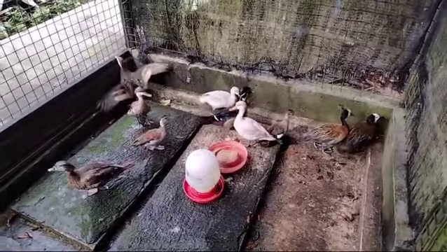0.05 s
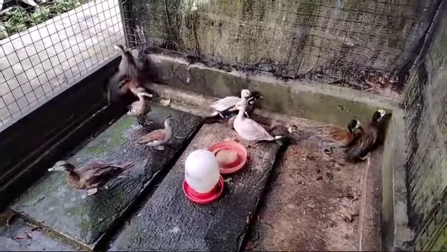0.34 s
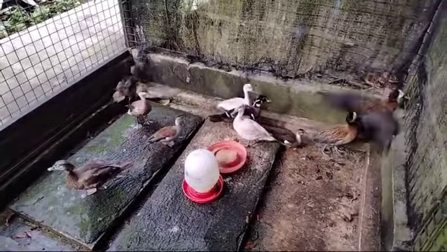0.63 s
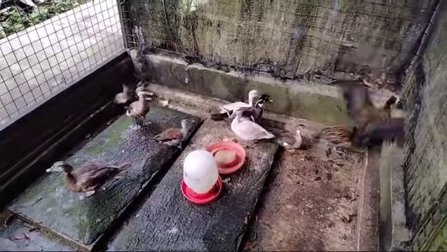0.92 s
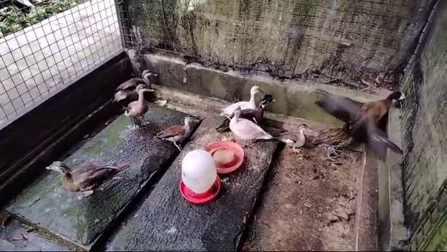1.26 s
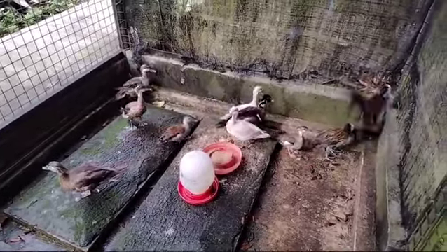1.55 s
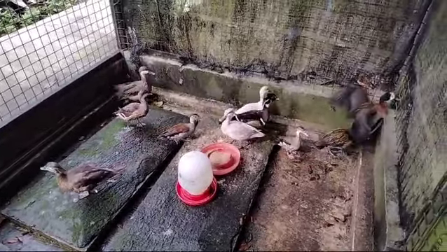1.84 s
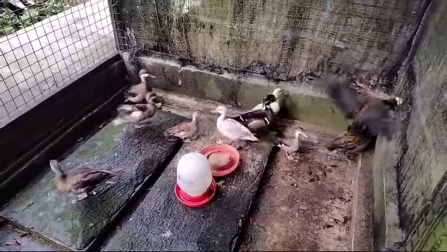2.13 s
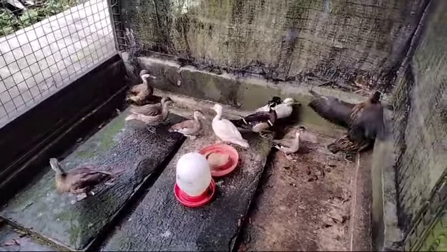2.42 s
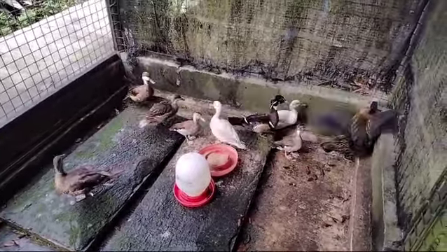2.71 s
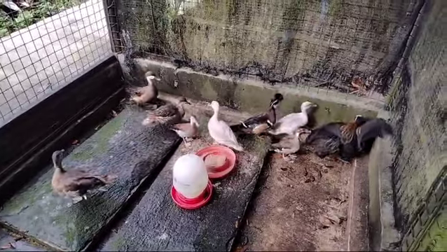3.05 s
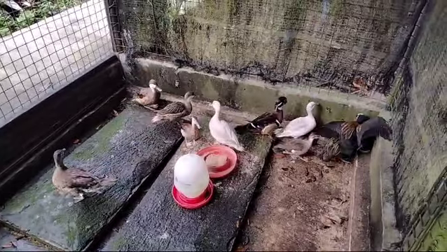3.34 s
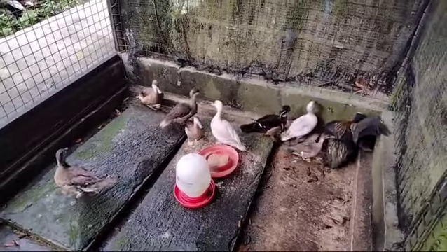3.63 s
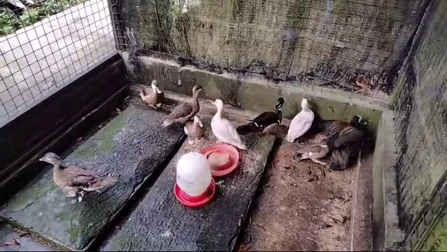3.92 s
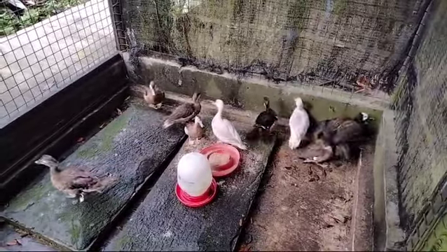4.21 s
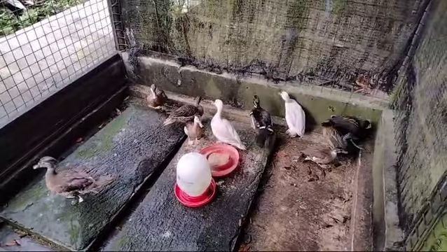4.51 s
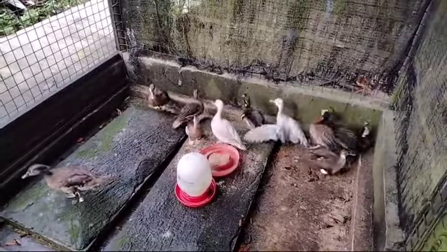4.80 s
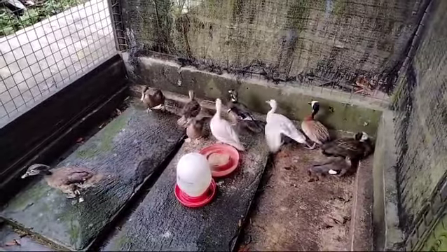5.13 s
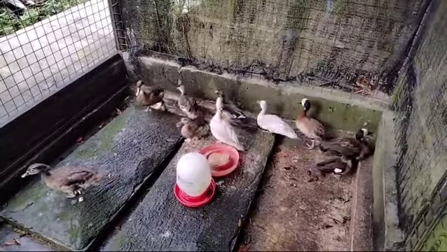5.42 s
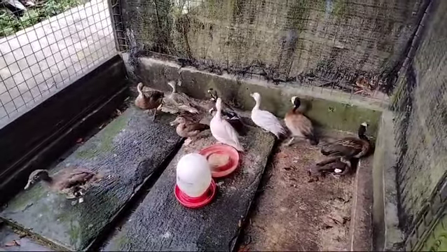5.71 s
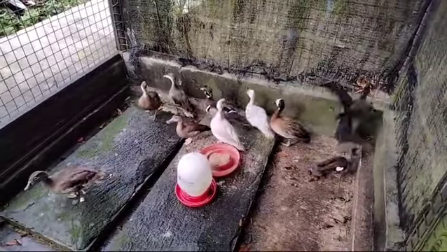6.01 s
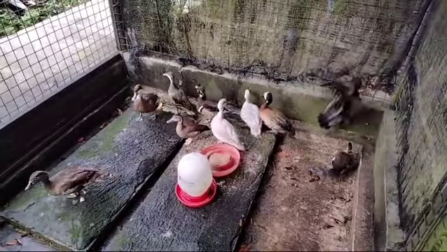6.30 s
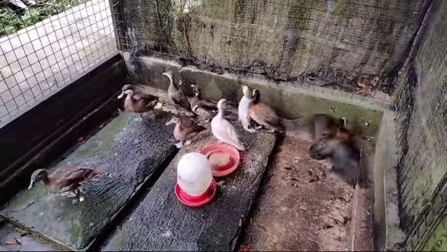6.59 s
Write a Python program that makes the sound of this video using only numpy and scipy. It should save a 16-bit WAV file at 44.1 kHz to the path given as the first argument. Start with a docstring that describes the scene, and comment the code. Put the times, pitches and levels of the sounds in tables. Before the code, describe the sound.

Bursts of wing flapping, ticking claws and scuffling feet from a flock of hissing, peeping ducks in an outdoor enclosure.

```python
"""Ducks scrambling in a pen

A few metres away, between concrete walls and wire mesh, one duck beats its wings against the wall
and stirs up the flock. Feathers crackle, shoved air thumps, claws tick and feet shuffle on grit.
Breath forced through open bills makes hisses; quick warbling peeps, thin whistles and a few hoarse
quacks bounce off the close walls, over a bed of outdoor air and faint hums."""
import sys
import numpy as np
from scipy import signal
from scipy.fft import rfft, irfft, next_fast_len
from scipy.io import wavfile
from scipy.ndimage import map_coordinates

SR = 44100
rng = np.random.default_rng(int(sys.argv[2]) if len(sys.argv) > 2 else 0)


def to_wav(sig):
    """Store sig (one row per channel, or 1-D mono) as 16-bit WAV at the path in sys.argv[1].

    Samples outside -1..1 are clipped; the rate is SR.
    """
    pcm = np.clip(np.atleast_2d(sig), -1, 1) * 32767
    pcm = np.round(pcm).astype(np.int16)
    wavfile.write(sys.argv[1], SR, pcm.T)  # frames by channels


N = 297869
TIME = np.arange(N) / SR


def gain_of(db):
    """Decibels to amplitude."""
    return 10 ** (np.asarray(db) / 20)


def unit_rms(x):
    """Scales to rms 1."""
    return x / np.sqrt(np.mean(x ** 2) + 1e-20)


def curve_at(points, hz):
    """Reads a curve along a log-frequency axis."""
    f, value = np.transpose(points)
    return np.interp(np.log(hz + 1), np.log(f + 1), value)


def add(mix, s, sound):
    """Mixes a sound in at s seconds."""
    part = mix[max(round(s * SR), 0):][:len(sound)]
    part += sound[:len(part)]


def coloured(x, spectrum):
    """Shapes white sound with an EQ curve, keeping its power."""
    size = next_fast_len(len(x), True)
    eq = unit_rms(gain_of(curve_at(spectrum, np.fft.rfftfreq(size, 1 / SR))))
    return irfft(rfft(x, size) * eq, size)[:len(x)]


def wander(size, rate):
    """Smooth random drift of rms near 1, with `rate` new values a second."""
    knots = rng.standard_normal(int(size / SR * rate) + 4)
    return map_coordinates(knots, [np.arange(size) * rate / SR + 1], order=3, mode="nearest")


def resonate(x, hz, width):
    """A steep resonance of gain 1 that can glide."""
    turn = np.exp(2j * np.pi * np.cumsum(hz * np.ones(len(x))) / SR)
    r = np.exp(-np.pi * width / SR)
    return 2 * (turn * signal.lfilter([(1 - r) ** 2], [1, -2 * r, r * r], x / turn + 1e-18)).real


def swell(t, rise, hold, fall):
    """An envelope that rises until t = 0, holds, and dies away."""
    return np.exp(np.minimum(t, 0) / rise - np.maximum(t - hold, 0) / fall)


def lingering(power, decay_s):
    """An amplitude envelope that follows a power curve and trails off behind it."""
    keep = np.exp(-1 / (decay_s * SR))
    return np.sqrt(signal.lfilter([1 - keep], [1, -keep], power))


def crackle(clump_db, clumps_per_s):
    """Grainy noise: feather barbs slip over each other in tiny clumps."""
    return unit_rms(rng.standard_normal(N) * gain_of(clump_db * np.minimum(wander(N, clumps_per_s), 2)))


def background(air_db=-62.5):
    """A bed of outdoor air, with faint wavering hums that come and go."""
    # outdoor air colour (frequency [Hz], relative level [dB])
    air_eq = [(15, -10.5), (25, 3), (60, -3), (110, -5.5), (200, -8.5), (300, -10), (450, -15.5),
              (700, -20.5), (1100, -18), (2500, -20), (3500, -29.5), (5000, -30.5), (8000, -31),
              (15500, -55)]
    # low hums (pitch [Hz], level [dB], crest time [s], spread [s])
    hums = [(171.4, -68, 2.94, 1.5), (174.4, -69, 5.88, 1.34), (230.8, -73.5, 7.6, 4.4),
            (143.5, -67, 5.55, 0.56), (296, -63.5, 0.92, 0.27)]
    out = coloured(rng.standard_normal(N), air_eq) * gain_of(air_db + 0.99 * wander(N, 5.25))
    for hz, db, s, spread in hums:
        tone = unit_rms(np.sin(2 * np.pi * np.cumsum(hz + 4.41 * wander(N, 20)) / SR))
        out += tone * gain_of(db + 3.1 * wander(N, 12)) * np.exp(-((TIME - s) / spread) ** 2)
    return out


def shuffling(feather_power, brushing=0.5, steps_per_s=55, step_decay_s=0.004, stir_db=-15.5):
    """Many small steps on grit over a steady brushing of plumage, livelier after any flapping."""
    # the flock's underlying bustle (time [s], level [dB])
    bustle = [(0, -59.5), (.3, -66), (.6, -56), (1.5, -56), (2.1, -56), (2.3, -60.5), (2.6, -60),
              (2.72, -62.5), (3.1, -60.5), (3.7, -68.5), (4.3, -64), (5.4, -60.5), (6.75, -58.5)]
    # grit and plumage colour (frequency [Hz], relative level [dB])
    rustle_eq = [(80, -0.5), (300, 6), (600, -2), (1200, -0.5), (2400, 0.5), (5000, -7), (7200, 0),
                 (10000, -6), (15500, -12)]
    steps = (rng.random(N) < steps_per_s / SR) * rng.random(N)
    contact = brushing + signal.lfilter([1], [1, -np.exp(-1 / (step_decay_s * SR))], steps)
    grit = unit_rms(contact * crackle(clump_db=1.0, clumps_per_s=770))
    restless = gain_of(np.interp(TIME, *np.transpose(bustle)))
    stirred = gain_of(stir_db) * lingering(feather_power, decay_s=0.074)
    return coloured(grit * np.hypot(restless, stirred), rustle_eq)


def peeps(start_ratio=1.45, dive_s=0.009, warble_hz=66, warble_depth=0.19, overtone_db=-17, rasp_db=-7):
    """A whistled note dives, then warbles fast and unevenly; air rasps along with it."""
    # peeps (time [s], length [s], level [dB], centre pitch after the dive [Hz])
    calls = [(.002, .017, -48, 2700), (0.028, 0.033, -48, 3805), (0.147, 0.036, -48.5, 3500),
             (0.214, 0.042, -49.5, 4260), (1.767, 0.031, -49.5, 3130), (3.253, 0.035, -51, 3420),
             (3.352, 0.047, -49.5, 3710), (4.145, 0.051, -59, 4100), (4.232, 0.037, -52, 3850),
             (4.462, 0.046, -51, 3426), (4.542, 0.039, -45, 4050), (4.644, 0.033, -50.5, 3700),
             (4.931, .028, -48.5, 2850), (5, 0.039, -45, 3770), (5.582, 0.032, -45, 3550),
             (5.706, 0.046, -50.5, 4050), (5.834, 0.036, -48, 4150), (5.906, .032, -54.5, 3820)]
    # breath colour (frequency [Hz], relative level [dB])
    rasp_eq = [(1000, -21), (1800, -18), (2300, 0.5), (3000, -12), (3900, -2), (4600, -0.5), (5400, -13.5),
               (6700, -5), (8000, -40), (15000, -29)]
    notes, rasp = np.zeros((2, N))
    for s, length, db, settled_hz in calls:
        t = np.arange(0, length, 1 / SR)
        settled = 1 - np.exp(-(t / dive_s) ** 2)
        rate_hz = warble_hz * rng.uniform(0.865, 1.098)
        warble = warble_depth * settled * np.cos(2 * np.pi * rate_hz * (t - length / 2))
        jitter = 0.06 * wander(4096, 713)[:len(t)]
        hz = settled_hz * (start_ratio + (1 - start_ratio) * settled) * (1 + warble + jitter)
        phase = 2 * np.pi * np.cumsum(hz) / SR
        effort = gain_of(db) * unit_rms(np.sin(np.pi * t / length) ** 0.5)
        add(notes, s, effort * (np.sin(phase) + gain_of(overtone_db) * np.sin(2 * phase)))
        add(rasp, s, effort * rng.standard_normal(4096)[:len(t)])
    return notes + gain_of(rasp_db) * coloured(rasp, rasp_eq)


def wing_power(beat_fall_s=0.021, swing_db=-10, flick_air_db=-15):
    """Power envelopes of feathers and air: a beat swings in, strikes and fades; a flick only flares."""
    # full wingbeats (time [s], stroke length [s], feather level [dB], air relative to feathers [dB])
    beats = [(.358, 0.0093, -38.5, -15.5), (0.389, .008, -44.5, -7.5), (.411, 0.023, -42, -7.5),
             (0.704, 0.046, -46, -10), (0.864, 0.014, -40, -7.5), (.992, 0.029, -40.5, -3.5),
             (1.303, 0.019, -40.5, -5), (1.673, 0.034, -44, -8.5), (1.840, 0.022, -37, -11),
             (2.012, 0.024, -37, -10), (6.21, .055, -48, -2), (6.411, 0.021, -39.5, -8.5),
             (6.471, 0.0059, -40, -3.5)]
    # light flicks and brushes of a wing (time [s], level [dB])
    flicks = [(0.118, -45.5), (.456, -46), (.58, -50), (.638, -47.5), (.757, -51), (.912, -46.5),
              (1.188, -51.5), (1.276, -47.5), (1.56, -50.5), (2.213, -49), (2.411, -51.5), (2.464, -47),
              (4.659, -52), (4.779, -45.5), (5.292, -59), (6.035, -48.5), (6.16, -50.5), (6.265, -49.5),
              (6.388, -49), (6.5, -43.5), (6.567, -46.5)]
    feathers, air = np.zeros((2, N))
    t = np.arange(-SR // 10, SR // 2) / SR
    for s, length, db, air_db in beats:
        swing = gain_of(swing_db) * swell(t, rise=0.028, hold=length, fall=beat_fall_s)
        strike = swell(t, rise=0.0046, hold=length, fall=beat_fall_s)
        stroke = np.maximum(swing, strike)
        add(feathers, s + t[0], (gain_of(db) * stroke) ** 2)
        add(air, s + t[0], (gain_of(db + air_db) * stroke) ** 2)
    flick = swell(t, rise=0.0089, hold=0, fall=0.022)
    for s, db in flicks:
        add(feathers, s + t[0], (gain_of(db) * flick) ** 2)
        add(air, s + t[0], (gain_of(db + flick_air_db) * flick) ** 2)
    return feathers, air


def wings(feather_power, air_power):
    """Each stroke gives a bright crackle of feathers and a darker rush of air."""
    # feather and air colours (frequency [Hz], relative level [dB])
    feather_eq = [(100, -26), (600, -45), (1500, -8), (2400, -5.5), (4000, -5.5), (5200, -10.5), (7000, 0),
                  (8500, -3.5), (11000, -6.5), (13000, -11.5), (15500, -10)]
    air_eq = [(30, 4.5), (65, 4), (120, -2.5), (300, 3.5), (550, -2.5), (1300, -2.5), (2400, -0.5),
              (4000, -15.5), (7000, -17), (16000, -43)]
    feathers = np.sqrt(feather_power) * crackle(clump_db=2.5, clumps_per_s=1000)
    rush = np.sqrt(air_power) * crackle(clump_db=2.0, clumps_per_s=420)
    return coloured(feathers, feather_eq) + coloured(rush, air_eq)


def draught(feather_power, relative_db=-20, band_hz=(40, 110)):
    """The air that the wings have set moving rumbles on for a moment."""
    low_band = signal.butter(2, band_hz, "band", fs=SR, output="sos")
    eddies = unit_rms(signal.sosfilt(low_band, rng.standard_normal(N)))
    return gain_of(relative_db) * eddies * lingering(feather_power, decay_s=0.16)


def claws(snap_s=0.0011, scrape_s=0.016, scrape_db=-13, trim_db=-5):
    """Claws and quills strike concrete: a sharp tick with a short scrape after it."""
    # strikes (time [s], level before trim [dB])
    ticks = [(.28, -40), (0.412, -30.5), (0.43, -31), (1.156, -40), (2.017, -27.5), (2.463, -32),
             (4.657, -35.5), (4.764, -36), (4.781, -28), (4.955, -37.5), (5.230, -39.5), (5.29, -38),
             (6.474, -26)]
    # tick colour (frequency [Hz], relative level [dB])
    claw_eq = [(100, -11), (1000, -20), (4000, -5), (5500, -8.5), (7500, -3), (10500, -5), (15500, -18)]
    out, t = np.zeros(N), np.arange(2048) / SR
    envelope = np.exp(-t / snap_s) + gain_of(scrape_db) * np.exp(-t / scrape_s)
    for s, db in ticks:
        add(out, s, gain_of(db + trim_db) * rng.standard_normal(len(t)) * envelope)
    return coloured(out, claw_eq)


def hiss(breaths, throat, attack_s, fade_db_per_s, climb_hz_per_s=0, onset_db=-22, bend_per_db=0.0026):
    """Air forced through an open bill builds, holds and fades; it rises and brightens with effort."""
    out, t = np.zeros(N), np.arange(SR) / SR
    for s, held, db, hz in breaths:
        effort_db = onset_db * np.exp(-t / attack_s) - fade_db_per_s * np.maximum(t - held, 0)
        main_hz = (hz + climb_hz_per_s * np.minimum(t, held)) * (1 + bend_per_db * effort_db)
        tilt_db_per_octave = 0.14 * (db + effort_db + 50)  # flat at -50 dB, duller below
        air = np.zeros(SR)
        for ratio, width, band_db in throat:
            band = resonate(rng.standard_normal(SR), ratio * main_hz, width)
            air += gain_of(band_db + tilt_db_per_octave * np.log2(ratio)) * band
        flutter_db = wander(SR, 130)
        add(out, s, air / air[t < held].std() * gain_of(db + effort_db + flutter_db))
    return out


def alarm_hiss():
    """The startled duck forces out one rising hiss that stops short."""
    # the breath (time [s], hold [s], level [dB], main resonance before the climb [Hz])
    breath = [(.325, .365, -50, 1720)]
    # throat resonances (multiple of the main one, width [Hz], relative level [dB])
    throat = [(1, 340, 2), (1.3, 550, -3), (2.05, 895, -5.5), (2.62, 700, -5.5), (4, 3000, -14)]
    return hiss(breath, throat, attack_s=0.022, fade_db_per_s=200, climb_hz_per_s=750)


def quacks(jitter=0.14, rasp=0.94):
    """Uneven pulses and puffs of air ring a wide throat: hoarse, far more breath than tone."""
    # quacks (time [s], length [s], level [dB], pitch [Hz], factor on the throat's resonances)
    calls = [(.664, 0.029, -38.5, 195.5, .92), (0.691, 0.062, -47, 166.6, 0.67),
             (1.006, 0.0385, -44, 192.7, 1), (6.062, 0.032, -44.5, 167.5, 0.87)]
    # throat resonances (base frequency [Hz], width [Hz], relative level [dB])
    throat = [(580, 470, -25), (1150, 1230, 4), (1580, 1200, -30), (2500, 1600, -10.5)]
    out = np.zeros(N)
    for s, length, db, hz, shift in calls:
        t = np.arange(0, length, 1 / SR)
        cycles = np.cumsum(hz * (1 + jitter * wander(8192, 200)[:len(t)])) / SR
        pulses = np.diff(np.floor(cycles), prepend=-1)
        puffs = np.exp(-(cycles % 1)) * rng.standard_normal(8192)[:len(t)]
        drive = (1 - rasp) * unit_rms(pulses) + rasp * unit_rms(puffs)
        voice = sum(gain_of(band_db) * resonate(drive, f * shift, width) for f, width, band_db in throat)
        add(out, s, gain_of(db) * unit_rms(voice * signal.windows.tukey(len(t), 0.25)))
    return out


def thumps(pulse_decay_s=0.0032, gust_db=-17, gust_decay_s=0.0068):
    """A wing shoves the air: a low pulse of a cycle or two, and a soft deep gust."""
    # wingbeats that give a low thump (time [s], level [dB], pitch [Hz])
    shoves = [(.862, -30.5, 274), (1.309, -38, 293), (1.317, -34, 322), (1.863, -32.5, 254),
              (2.013, -34, 240), (6.223, -42, 340), (6.474, -30, 354)]
    out, t = np.zeros(N), np.arange(4096) / SR
    for s, db, hz in shoves:
        pulse = np.sin(2 * np.pi * hz * t) * np.exp(-t / pulse_decay_s)
        gust_hz = 62 * rng.uniform(0.88, 0.97)
        gust = gain_of(gust_db) * np.sin(2 * np.pi * gust_hz * t) * np.exp(-t / gust_decay_s)
        add(out, s, -gain_of(db) * (pulse + gust))
    return out


def flock_hisses():
    """The other ducks breathe out hisses that ease in and trail away."""
    # breaths (time [s], hold [s], level [dB], main resonance at full effort [Hz])
    breaths = [(2.765, 0.37, -49, 2410), (3.80, 0.41, -54, 2296), (4.45, 0.31, -57, 2240),
               (5.06, 0.34, -57, 2265), (5.6, 0.36, -66, 2480), (6.23, 0.37, -53.5, 2260)]
    # throat resonances (multiple of the main one, width [Hz], relative level [dB])
    throat = [(.82, 726, -12), (1, 427, 1), (1.11, 436, -6), (1.55, 640, -9), (1.78, 755, -8.5),
              (2.22, 547, -9.5), (2.63, 560, -11.5), (3.3, 3460, -22)]
    return hiss(breaths, throat, attack_s=0.04, fade_db_per_s=58)


def whistles(sag=0.039, waver=0.0056):
    """A high and a low voice whistle thin notes that swell, fade and sag slightly in pitch."""
    # each voice's notes (time [s], length [s], base level [dB], starting pitch [Hz])
    high_notes = [(5.446, .036, -54, 3690), (5.495, 0.051, -62, 3590), (6.572, 0.017, -54, 3180)]
    low_notes = [(6.62, .125, -62, 2560)]
    # each voice's harmonics (multiple of the pitch, gain [dB])
    high_harmonics = [(1, 5.5), (2, -3), (3, -26)]
    low_harmonics = [(1, -2), (2, -1), (3, 1)]
    out = np.zeros(N)
    for notes, harmonics in (high_notes, high_harmonics), (low_notes, low_harmonics):
        for s, length, db, hz in notes:
            progress = np.arange(0, length, 1 / SR) / length
            bend = 1 - sag * progress + waver * wander(SR, 276)[:len(progress)]
            phase = 2 * np.pi * np.cumsum(hz * bend) / SR
            tone = sum(gain_of(gain_db) * np.sin(k * phase) for k, gain_db in harmonics)
            add(out, s, gain_of(db) * np.sin(np.pi * progress) * tone)
    return out


def echoes(wet_db, early_db, predelay_s=0.006):
    """Close walls return a few quick echoes, then a short diffuse tail."""
    # the pen's decay (frequency [Hz], time to fall 60 dB [s])
    decay_times = [(150, 1), (1000, 0.39), (4000, 0.55), (8000, 0.33), (15000, 0.41)]
    t = np.arange(SR) / SR
    hz, frame_s, spectra = signal.stft(rng.standard_normal(SR) * (t > predelay_s), SR, nperseg=256)
    decay = gain_of(-60 * frame_s / curve_at(decay_times, hz)[:, None])
    tail = signal.istft(spectra * decay, SR, nperseg=256)[1][:SR]
    response = gain_of(wet_db) * tail / np.linalg.norm(tail)
    for delay_s in rng.uniform(0.002, 0.022, size=8):
        response[int(delay_s * SR)] += gain_of(early_db) * rng.choice([-1, 1])
    response[0] += 1  # direct sound
    return response / np.linalg.norm(response)


def pen(x, wet_db, early_db, tails=3, crossfade_hz=1.7):
    """Crossfades between several echo tails so the reverb stays smooth and does not ring."""
    fades = [np.maximum(np.cos(2 * np.pi * (crossfade_hz * TIME + k / tails)), 0) for k in range(tails)]
    return sum(signal.fftconvolve(x * fade / sum(fades), echoes(wet_db, early_db))[:N] for fade in fades)


def scene():
    """The flock in its pen, in mono: movement stays fairly dry, voices carry more of the walls."""
    feather_power, air_power = wing_power()
    scramble = wings(feather_power, air_power) + claws() + shuffling(feather_power)
    movement = pen(scramble, wet_db=-10, early_db=-22.5)
    wing_air = pen(thumps(), wet_db=-15.5, early_db=-24) + draught(feather_power)
    hisses = flock_hisses() + alarm_hiss()
    thin_calls = pen(whistles() + peeps(), wet_db=0.5, early_db=-20)
    hoarse_calls = pen(quacks(), wet_db=-0.5, early_db=-17)
    voices = thin_calls + hoarse_calls + pen(hisses, wet_db=-7, early_db=-18)
    return (movement + wing_air + voices + background())[None]


def record(dry, cutoff_hz=15700):
    """A steep low-pass takes off the very top of the treble."""
    low_pass = signal.firwin(511, cutoff_hz, window=("kaiser", 9), fs=SR)
    return signal.oaconvolve(dry, low_pass[None], "same")


dry = scene()
out = record(dry)
to_wav(out)
```